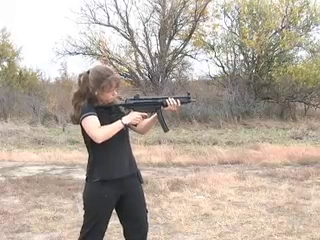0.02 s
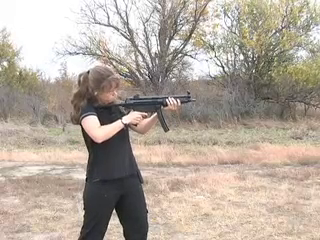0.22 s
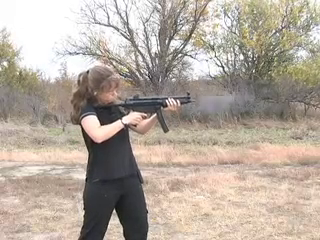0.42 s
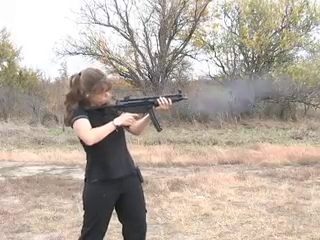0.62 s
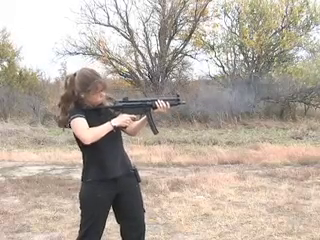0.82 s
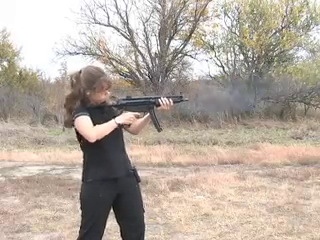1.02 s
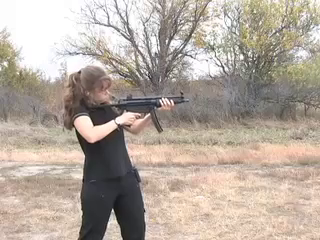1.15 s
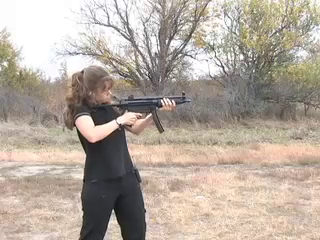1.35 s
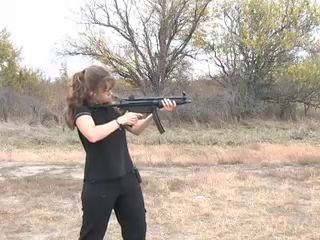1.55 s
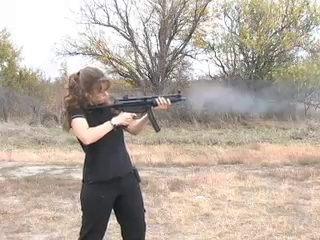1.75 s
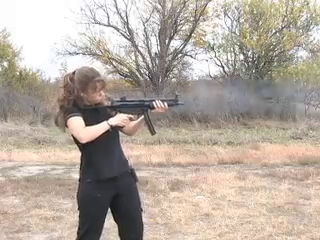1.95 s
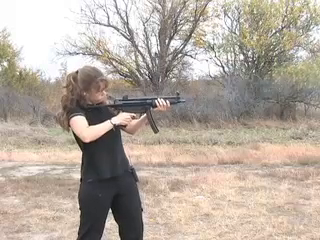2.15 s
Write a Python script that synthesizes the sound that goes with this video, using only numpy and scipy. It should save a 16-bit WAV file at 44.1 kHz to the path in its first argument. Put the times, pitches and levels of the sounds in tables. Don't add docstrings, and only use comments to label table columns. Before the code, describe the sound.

A submachine gun fires two quick four-round bursts a few metres from a small overloading microphone in a dry field; tree-line echoes and a rolling tail follow each, over faint insects and light wind.

```python
import sys
import numpy as np
from scipy import signal
from scipy.fft import rfft, irfft
from scipy.io import wavfile
from scipy.ndimage import uniform_filter1d

SR = 44100
rng = np.random.default_rng(int(sys.argv[2]) if len(sys.argv) > 2 else 0)


def decibels_to_gain(level_db):
    exponent = np.asarray(level_db, float) / 20
    return 10 ** exponent


def transcribe(signal):
    frames = np.atleast_2d(signal).T
    limited = np.clip(frames, -1, 1)
    pcm = np.round(limited * 32767).astype(np.int16)
    wavfile.write(sys.argv[1], SR, pcm)


N = 97020

# t/s, blast level/dB, ground slap level/dB, brush scatter level/dB, bolt clatter level/dB
ROUNDS = [
    (.507, -7, -40, -13.5, -40),
    (0.582, -14.5, -30, -13, -40),
    (0.661, -6.5, -30, -15, -39),
    (.742, -12, -10, -17.5, -40),
    (1.68, -8.5, -14, -14, -24.5),
    (1.761, -7.5, -11, -13, -19.5),
    (1.844, -7.5, -18, -13.5, -18),
    (1.922, -10, -8, -17, -20),
]
# t/s, level/dB, rise/s, T60/s, level of the airy part/dB
REFLECTIONS = [(.777, -20.5, 0.0033, 0.22, -1), (0.829, -26, .001, 0.034, -19),
               (.846, -16, 0.0015, 0.097, 3), (.853, -12, 0.01, 0.012, -8),
               (0.869, -15, 0.0083, 0.01, -0.5), (0.9, -23, .002, 0.022, -5),
               (.924, -19.5, 0.0035, .1, -0.5), (.936, -9, 0.0049, .01, -8.5),
               (0.952, -15, 0.0011, 0.011, -10), (0.961, -24, .001, 0.017, -8),
               (.97, -21, 0.0015, 0.04, -9), (.988, -25, .001, 0.015, -6), (1, -21, 0.0012, 0.033, -15),
               (1.003, -16, 0.0035, 0.064, -2.5), (1.011, -12, 0.0076, 0.018, -8.5),
               (1.032, -20, 0.0012, 0.024, -5), (1.05, -27, .003, 0.032, -7), (1.056, -27, .001, .02, -7),
               (1.077, -19, 0.00092, 0.015, 0), (1.083, -18.5, 0.00091, .035, -4.5),
               (1.11, -23.5, 0.0019, 0.028, -5), (1.128, -24, 0.0012, 0.059, -10),
               (1.135, -19.5, 0.00034, 0.032, -6.5), (1.157, -25, 0.00065, 0.013, -14),
               (1.163, -22.5, .001, 0.021, -11.5), (1.198, -34, 0.0093, 0.21, -12),
               (1.212, -39.5, .002, 0.026, 0.5), (1.236, -18.5, 0.00087, 0.015, -11),
               (1.24, -31, 0.00034, 0.033, -7.5), (1.987, -18, 0.0029, 0.034, -13),
               (2.004, -22, 0.0014, 0.062, -15), (2.012, -14, 0.015, 0.094, -3),
               (2.044, -8.5, 0.0038, 0.013, -4), (2.074, -19.5, 0.00078, 0.016, 0),
               (2.093, -19, 0.0056, 0.19, -2), (2.106, -13.5, 0.0051, 0.0099, -5),
               (2.127, -35, .001, 0.009, -14), (2.135, -31, .001, 0.013, -11),
               (2.1462, -17.5, 0.00098, 0.013, -3), (2.171, -16.5, 0.013, 0.19, -4.5)]
# f/Hz, T60/s
FIELD_T60 = [(100, 1.53), (400, 1.8), (1200, 2.19), (3000, 1.5), (10000, 0.85)]
# t/s, leaves the rail t/s, push/rails, rise/s, release/s
OFFSETS = [(.5162, .557, 5, .001, .014), (.587, .594, 2.1, .004, .0004), (.5939, .621, -5, .0005, .017),
           (.664, .672, -1.1, .006, .001), (.6715, .700, -4, .001, .017), (.744, .769, -1.3, .007, .017),
           (1.685, 1.691, .9, .004, .003), (1.692, 1.699, -.9, .005, .004), (1.701, 1.706, .3, .003, .008),
           (1.766, 1.770, -.6, .002, .006), (1.839, 1.8442, 1.4, .003, .0005),
           (1.8442, 1.847, -1.6, .0005, .02), (1.9188, 1.923, -2.0, .0005, .022),
           (1.076, 1.081, .16, .002, .006), (1.99, 2.0, -.25, .006, .012)]
# t/s, relative height (times 1.4 gives full scale)
ESCAPED_CRESTS = [(.5254, -.07), (.5258, -.06), (.527, -.08), (.5277, -.09), (.5922, -.08), (.593, -.1),
                  (.5937, -.1), (.5965, .03), (.5976, .05), (.5984, .04), (.6012, .03), (.6044, .08),
                  (.605, .2), (.6062, .11), (.6079, .14), (.6167, .03), (.6195, .01), (.6721, .31),
                  (.6734, .07), (.6747, .23), (.6758, .21), (.6772, .05), (.6784, .03), (.6805, .15),
                  (.681, .05), (.6822, .04), (.6829, .15), (.6842, .19), (.6847, .07), (.6857, .19),
                  (.6945, .006), (.6975, .006), (1.9201, .06), (1.9213, .04)]
# f/Hz, arch of the glide f/Hz, chirp rate/Hz, level/dB
TRILLERS = [
    (6850, 950, 28.5, -69),
    (7250, 900, 31.0, -69),
    (7800, 750, 34.0, -75),
]
# t/s, level/dB
CRICKET = [
    (.015, -80),
    (.275, -86),
    (.33, -79),
    (.405, -80),
    (1.362, -76),
    (1.445, -81),
]
# t/s, click level/dB, ring level/dB
LANDINGS = [
    (1.074, -32, -87),
    (1.084, -47, -85),
    (1.315, -69, -93),
    (1.361, -53.5, -91),
    (1.546, -45.5, -55.5),
    (1.650, -60, -90),
]
# f/Hz, level/dB, T60/s
BRASS_MODES = [(9640, -2, .3), (9780, -2, .3), (11200, -16, .6), (11206.5, -16, .6), (12730, -16, .2),
               (13780, -11, .4)]
# t/s, level/dB, T60/s
THUMPS = [
    (0.857, -34, 0.18),
    (0.937, -34, 0.092),
    (1.01, -33, 0.089),
    (1.075, -33, 0.073),
    (1.14, -50, 0.42),
    (1.235, -39.5, 0.083),
    (1.5, -44.5, 0.27),
    (1.975, -26.5, 0.26),
]
# t/s, level/dB, rise/s, T60/s
LEAVES = [
    (1.17, -63, 0.055, 0.25),
    (1.03, -53, .01, 0.21),
]
# f/Hz, spectral level/dB per Hz
BLAST_SPECTRUM = [(88, -7), (150, -11), (228, -10), (387, 1.5), (1000, -1.5), (1800, -3.5), (2400, -10.5),
                  (14000, -29)]
SCATTER_SPECTRUM = [(88, -2), (150, -3.5), (1100, -3), (1410, -7.5), (1740, 0.5), (3570, -15), (8230, -12),
                    (14000, -22)]
REFLECTION_SPECTRUM = [(88, -20), (150, -51), (359, -10.5), (1260, -1), (1770, -1), (3570, -19),
                       (6070, -27), (8550, -20), (14000, -44)]
TAIL_SPECTRUM = [(59, -35), (100, -4.5), (353, -12), (698, -2), (1380, -5.5), (1530, -5), (4780, -15.5),
                 (8180, -19.5), (14000, -19.5)]
AIR_SPECTRUM = [(22, 20), (50, -4), (120, -15.5), (400, -23), (1500, -29), (4000, -38.5), (14000, -40.5)]
HAZE_SPECTRUM = [(6500, -56), (7300, -9), (7900, 8), (8500, -5), (9300, -53)]
CLICK_SPECTRUM = [(300, -37), (3000, -4), (14000, 1)]
THUMP_SPECTRUM = [(20, 18.5), (60, -1.5), (200, -16.5), (500, -35), (14000, -80)]
LEAF_SPECTRUM = [(3000, -31), (7000, -17), (10000, 6), (14000, -6)]
TWIG_SPECTRUM = [(300, -7), (1800, 2), (3000, -19), (14000, -20)]

RAIL = 0.27


def rms_one(x):
    return x / np.sqrt(np.mean(x ** 2) + 1e-20)


def at_hz(points, hz):
    f, value = np.transpose(points)
    return np.interp(np.log(hz), np.log(f), value)


def drift(rate):
    coarse = 40
    r = np.exp(-2 * np.pi * coarse * rate / SR)
    white = rng.standard_normal(N // coarse + 2002)
    slow = signal.lfilter([1], [1, -2 * r, r * r], white)[2000:]
    return np.interp(np.arange(N) / coarse, np.arange(len(slow)), rms_one(slow))


def coloured(spectrum):
    hz = np.maximum(np.arange(N // 2 + 1) * SR / N, 1)
    weighted = rfft(rng.standard_normal(N)) * decibels_to_gain(at_hz(spectrum, hz)) * (hz > 15)
    return rms_one(irfft(weighted, N))


def swell(start, rise, t60, hold=0, bend=1):
    t = np.arange(N) / SR - start
    growth = np.clip(t / max(rise, 1e-4), 0, 1) ** bend
    decay = decibels_to_gain(-60 * np.clip(t - rise - hold, 0, None) / max(t60, 1e-3))
    return (growth * decay) ** 2


def power(db, *shape):
    return decibels_to_gain(2 * db) * swell(*shape)


def open_air():
    return decibels_to_gain(-49.5 - 4 * drift(10.0)) * coloured(AIR_SPECTRUM)


def insects():
    t = np.arange(N) / SR
    out = decibels_to_gain(-77 + 1.0 * drift(30)) * coloured(HAZE_SPECTRUM)
    for hz, arch_hz, rate, db in TRILLERS:
        cycle = np.cumsum(rate * (1 + .06 * drift(4))) / SR % 1
        arch = np.sin(np.pi * cycle)
        level = decibels_to_gain(db + 3.0 * drift(8) + 2.5 * drift(150))
        pitch = hz + arch_hz * arch + 90 * drift(10) + 40 * drift(120)
        out += level * arch ** 1.2 * np.sin(2 * np.pi * np.cumsum(pitch) / SR)
    chirp_s, chirp_hz, sag_hz = 0.032, 4400, 250
    for s, db in CRICKET:
        u = np.clip((t - s) / chirp_s, 0, 1)
        level = decibels_to_gain(db + 1.5 * drift(200)) * np.sin(np.pi * u) ** .5
        out += level * np.sin(2 * np.pi * np.cumsum(chirp_hz - sag_hz * u) / SR)
    return out


def undergrowth():
    leaves = np.sqrt(sum(power(db, s, rise, t60) for s, db, rise, t60 in LEAVES))
    twig = np.sqrt(power(-67, 0.13, 0.0031, 0.065))
    return leaves * coloured(LEAF_SPECTRUM) + twig * coloured(TWIG_SPECTRUM)


def thumps():
    puffs = sum(power(db, s, 0.0021, t60) for s, db, t60 in THUMPS)
    return np.sqrt(puffs) * coloured(THUMP_SPECTRUM)


def cases():
    t = np.arange(N) / SR
    clicks = sum(power(db, s, 0.001, 0.025) for s, db, _ in LANDINGS)
    out = np.sqrt(clicks) * coloured(CLICK_SPECTRUM)
    for s, _, ring_db in LANDINGS:
        for hz, db, t60 in BRASS_MODES:
            level = decibels_to_gain(ring_db + db + 2.0 * drift(40)) * np.sqrt(swell(s, 0.00092, t60))
            out += level * np.sin(2 * np.pi * hz * (t - s))
    return out


def field_edge(s):
    edge_s, edge_db, step_s = .805, -5.5, 0.0071
    passed = np.clip((np.arange(N) / SR - s - edge_s) / step_s, 0, 1)
    return decibels_to_gain(2 * edge_db * passed)


def rolling_tail():
    tail_db, rise_s, patchy_db = -33, 0.092, 1.0
    edges = 70 * 2 ** np.arange(0, 8.1, .5)
    together = drift(25)
    white = coloured(TAIL_SPECTRUM), coloured(TAIL_SPECTRUM)
    out = 0
    for k, (low, high) in enumerate(zip(edges, edges[1:])):
        sos = signal.butter(2, [low, high], "band", fs=SR, output="sos")
        band = signal.sosfilt(sos, white[k % 2])
        t60 = at_hz(FIELD_T60, np.sqrt(low * high))
        decay = sum(swell(s, rise_s, t60) * field_edge(s) for s, *_ in ROUNDS)
        out = out + band * np.sqrt(decay) * decibels_to_gain(patchy_db * (.8 * together + .7 * drift(15)))
    return decibels_to_gain(tail_db) * out


def tree_lines():
    even_s, grain_db, grain_hz = .003, 1.5, 120
    noise = coloured(REFLECTION_SPECTRUM)
    noise = noise / np.sqrt(uniform_filter1d(noise ** 2, size=int(even_s * SR)) + 0.21)
    noise = noise * rms_one(decibels_to_gain(grain_db * drift(grain_hz)))
    shapes = [power(db, s, rise, t60) for s, db, rise, t60, _ in REFLECTIONS]
    air_power = sum(decibels_to_gain(2 * row[-1]) * shape for row, shape in zip(REFLECTIONS, shapes))
    airy = np.sqrt(air_power) * noise
    band = signal.butter(2, [560, 1970], "band", fs=SR, output="sos")
    return signal.sosfilt(band, np.sqrt(sum(shapes)) * noise - airy) + airy


def bolt_and_brush():
    total = 0
    for s, _, _, brush_db, clatter_db in ROUNDS:
        tick = power(-26, s - .0098, 0.0026, 0.032)
        clatter = power(clatter_db, s + 0.015, 0.0061, 0.27)
        brush = power(brush_db, s + 0.034, 0.025, 0.13, 0.013, 2.05)
        total = total + tick + clatter + brush
    return np.sqrt(total) * coloured(SCATTER_SPECTRUM)


def blast():
    total = 0
    for s, blast_db, slap_db, *_ in ROUNDS:
        direct = power(blast_db, s, 0.0021, 0.12, 0.005)
        ground = power(slap_db, s + .0165, 0.00031, .03, .005)
        total = total + direct + ground
    return np.sqrt(total) * coloured(BLAST_SPECTRUM)


def shove():
    sink_s = .004
    out = 0
    for s, free, push, rise, release in OFFSETS:
        stay = free - s - rise
        steps = [s, rise, max(stay - sink_s, 1e-4), min(sink_s, abs(stay) + 1e-4), release]
        values = [0, push, push, np.clip(push, -1, 1), 0]
        out = out + np.interp(np.arange(N) / SR, np.cumsum(steps), values)
    return RAIL * out


def crests():
    t = np.arange(N) / SR
    width_s = .00007
    return 1.4 * sum(height * np.exp(-abs(t - s) / width_s) for s, height in ESCAPED_CRESTS)


def scene():
    background = open_air() + insects() + undergrowth() + thumps() + cases()
    returns = rolling_tail() + tree_lines()
    gun = bolt_and_brush() + blast() + shove()
    return (background + returns + gun)[None]


def band_limit(x):
    return signal.sosfilt(signal.butter(12, 14920, fs=SR, output="sos"), x)


def record(dry):
    coupling_hz, coupling_q, blocking_hz, cutoff_hz = 53.7, 1.29, 32, 14350
    w = 2 * np.pi * coupling_hz
    coupling = signal.bilinear([1, 0, 0], [1, w / coupling_q, w * w], SR)
    x = signal.lfilter(*coupling, np.clip(dry, -RAIL, RAIL))
    x = signal.lfilter(*signal.butter(1, blocking_hz, "high", fs=SR), x)
    hiss = decibels_to_gain(-112) * rng.standard_normal(x.shape)
    duck = np.minimum(sum(swell(s + 0.0012, 0.026, 2.2) for s, *_ in ROUNDS), 1)
    x = x * decibels_to_gain(-4 * duck) + crests() + hiss
    x = signal.sosfilt(signal.cheby2(16, 60, cutoff_hz, fs=SR, output="sos"), x)
    return band_limit(x)


dry = scene()
out = record(dry)
transcribe(out)
```